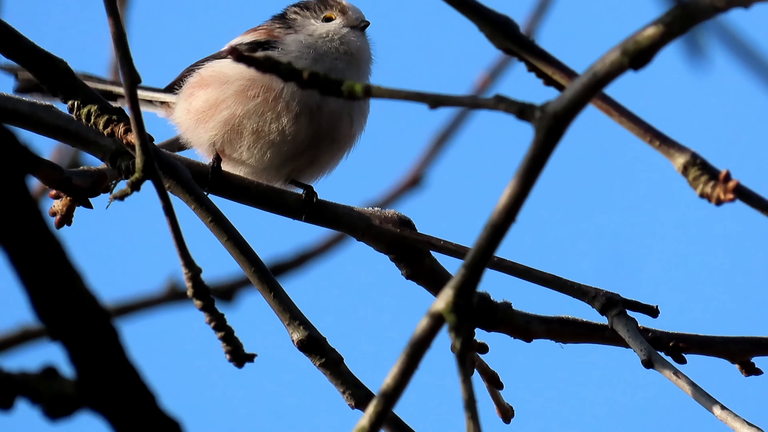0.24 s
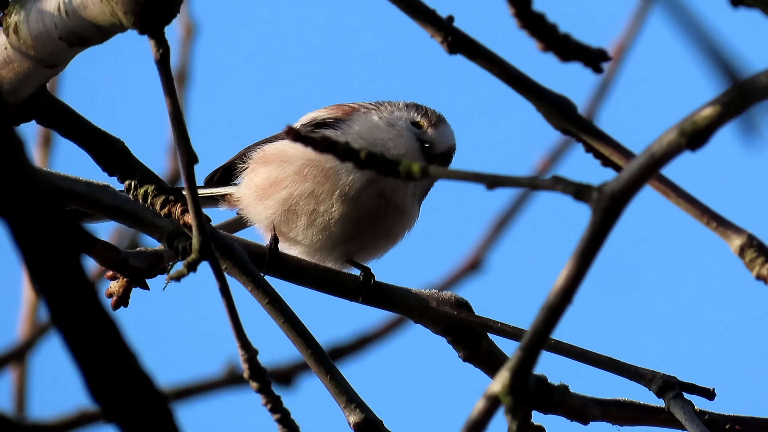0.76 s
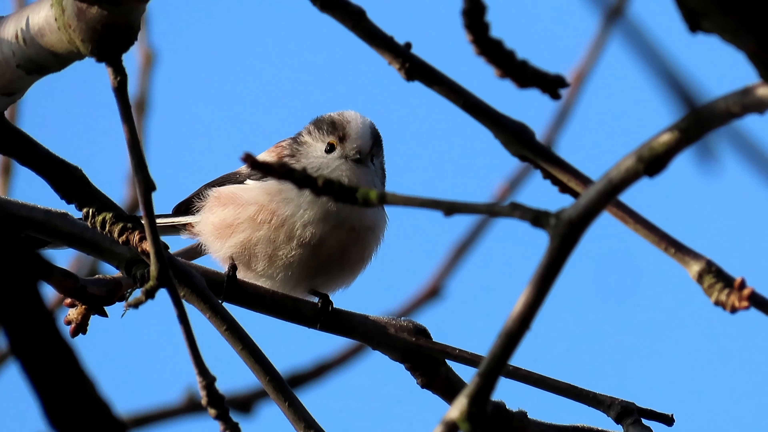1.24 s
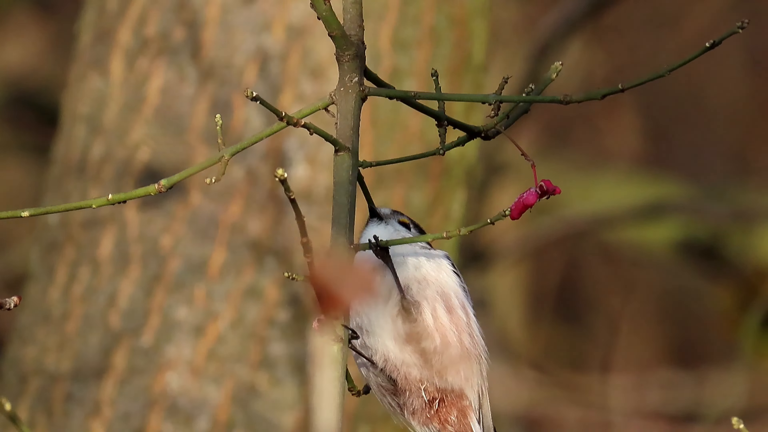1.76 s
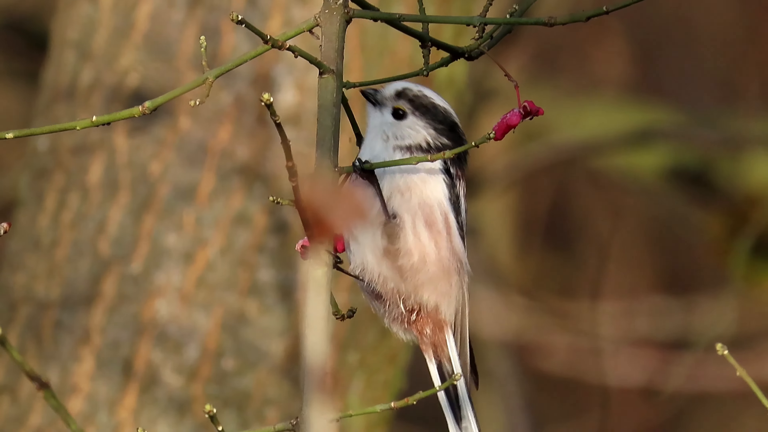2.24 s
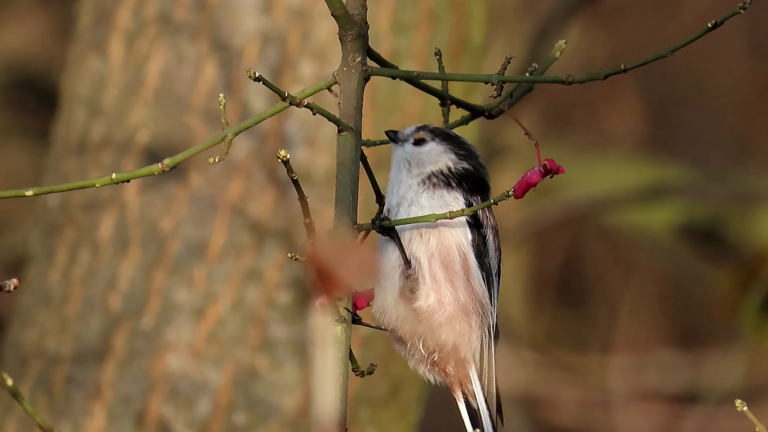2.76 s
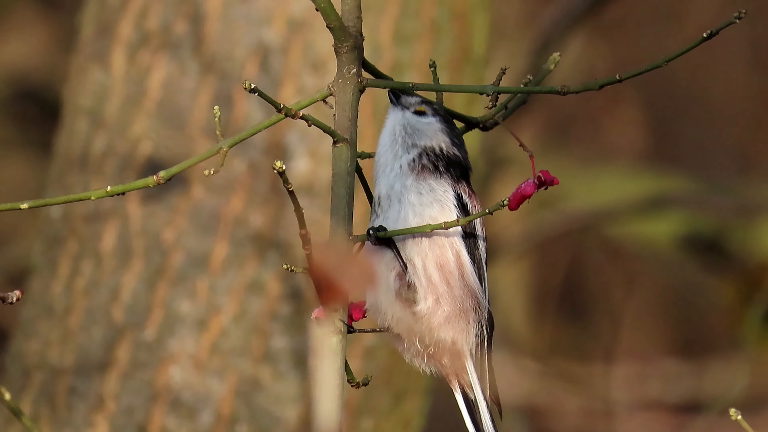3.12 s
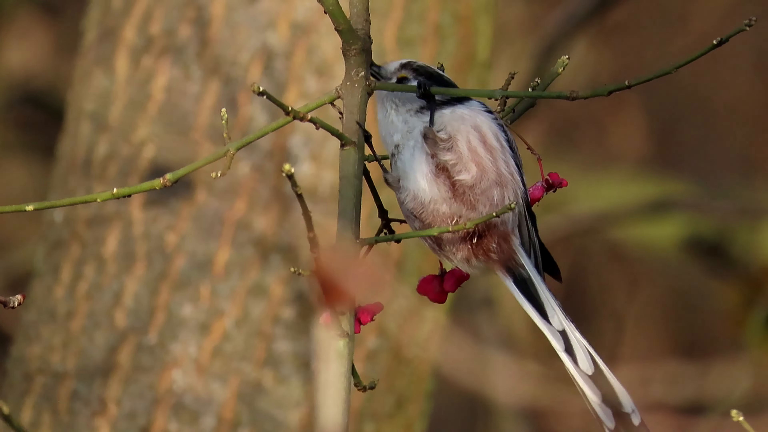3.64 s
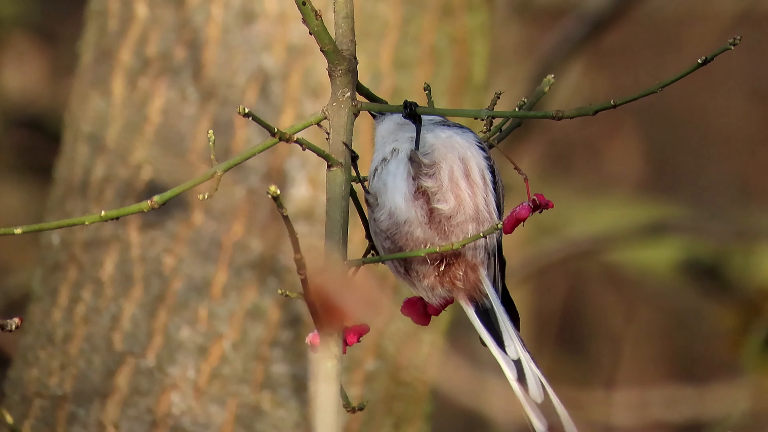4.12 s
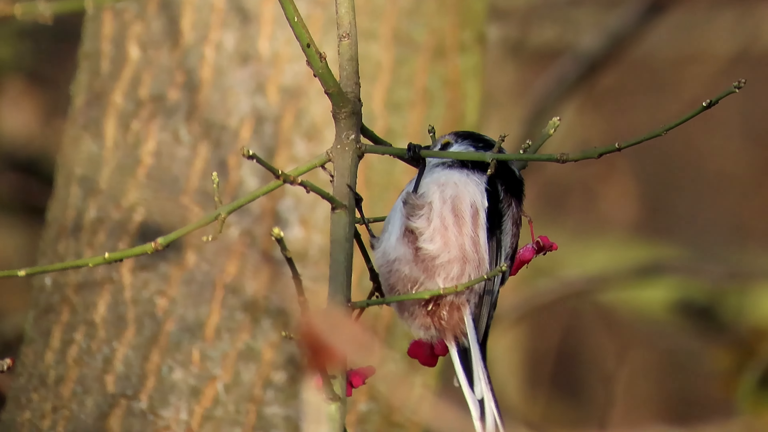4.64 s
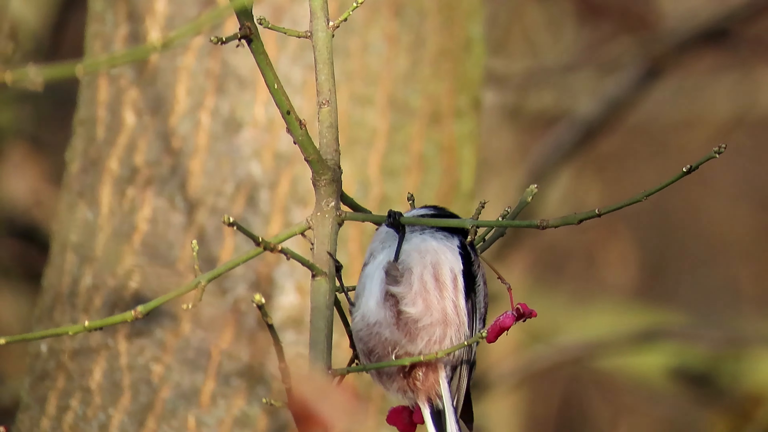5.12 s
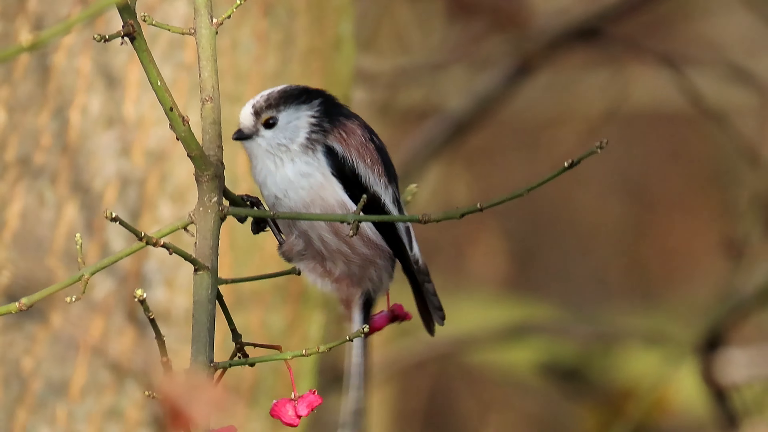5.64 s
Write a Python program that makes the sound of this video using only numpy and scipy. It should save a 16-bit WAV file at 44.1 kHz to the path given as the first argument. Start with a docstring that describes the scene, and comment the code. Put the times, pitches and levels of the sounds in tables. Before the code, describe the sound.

Outdoors among bare branches, a microphone fairly near a small tit picks up five bright, scratchy calls, two pairs and then a later one. Each starts as a very high rippling whistle and breaks into five to seven quick chirring strokes. A distant descending mew opens the scene, faint soft low pips follow, and after the fourth call far thin notes and a throbbing trill fill the gap.

```python
"""Microphone hiss and the falling mew of a larger bird far off; then, from a twig, a small tit calls five times.
Each call is a thin whistle that dives three times, then breaks into a rattle of quick pitch arches, all sung by
a gliding tone with overtones and puffs of air; a twig-and-trunk echo smears it. Soft low hoots are short sine
pips. Late on, far small birds seep and trill: tones that waver on their many paths through the trees."""
import sys
import numpy as np
from scipy import signal
from scipy.fft import rfft, irfft
from scipy.io import wavfile
from scipy.ndimage import uniform_filter1d

SR = 44100
rng = np.random.default_rng(int(sys.argv[2]) if len(sys.argv) > 2 else 0)


def store_pcm(level_fs):
    """Save levels as 16-bit WAV."""
    pcm = np.round(np.clip(level_fs, -1, 1) * 32767).astype(np.int16)
    wavfile.write(sys.argv[1], SR, np.atleast_2d(pcm).T)


def field_ratio(decibels):
    """Amplitude ratio for a level in dB (20 dB per decade); scalars and array-likes work."""
    return 10 ** (np.asarray(decibels, dtype=float) / 20)


N = 259308  # samples in the scene


def evened(x):
    """Scales to rms 1."""
    return x / np.sqrt(np.mean(abs(x) ** 2) + 1e-20)


def read(points, hz, axis=1):
    """Reads a spectrum column on a log-frequency axis."""
    columns = np.transpose(points)
    return np.interp(np.log(hz + 1), np.log(columns[0] + 1), columns[axis])


def add(mix, s, sound):
    """Mixes a sound in at s seconds."""
    part = mix[round(s * SR):][:len(sound)]
    part += sound[:len(part)]


def hiss():
    """Microphone hiss and far air: random short-time spectra, a little patchy."""
    # colour of the hiss, floored at -36 dB: (frequency [Hz], relative density [dB])
    hiss_colour = [(120, -69), (200, -23.5), (278, -28), (359, -14), (386, -13), (430, -14), (926, -13),
                   (1490, -18.5), (2220, -15), (2820, -17.5), (3990, -9), (5850, -9), (8580, 0),
                   (9750, -3.5), (12000, -12), (15800, -18)]
    level_db, patch_db = -62.5, 1.6  # rms of the whole hiss; rms of its patchiness
    frames, hz = N // 512 + 5, np.fft.rfftfreq(2048, 1 / SR)
    real, imaginary, patches = rng.standard_normal((frames, 1025, 3)).T
    patches = uniform_filter1d(patches, 16, 0)  # over frequency
    patches = evened(uniform_filter1d(patches, 8, 1))  # over time
    colour_db = np.maximum(read(hiss_colour, hz), -36)[:, None]
    spectra = (real + 1j * imaginary) * field_ratio(colour_db + patch_db * patches)
    noise = signal.istft(spectra, nperseg=2048, noverlap=1536)[1][:N]
    return field_ratio(level_db) * evened(noise)


def blurred(t, hz, db, blur_hz, clear):
    """A far tone: many paths through the trees make it waver in level and phase; clear = steady share of power."""
    chance = rng.standard_normal((len(t) + 2000, 2)) @ [1, 1j]
    r = np.exp(-np.pi * blur_hz / SR)
    waver = evened(signal.lfilter([1], np.convolve([1, -r], [1, -r]), chance)[2000:])
    paths = np.sqrt(clear) + np.sqrt(1 - clear) * waver
    tone = paths * np.exp(2j * np.pi * np.cumsum(hz) / SR)
    fade = np.clip(np.minimum(t - t[0], t[-1] - t) / 0.0038, 0, 1)
    return np.sqrt(2) * field_ratio(db) * tone.real * fade  # so that db is an rms level


def mew():
    """A larger bird far off: one long falling pitch with its second and third multiples."""
    # glide of the mew: (time [s], pitch [Hz])
    mew_pitch = [(0, 2280), (.1, 2199), (.68, 2147), (.85, 2020), (1.35, 1976)]
    # three swells, two fainter ones, then a fade: (time [s], level [dB], level of the octave [dB])
    mew_level = [(0, -67, -74), (.04, -67.5, -71.5), (.12, -54, -63.5), (0.211, -68.5, -78),
                 (.33, -56, -64), (0.439, -68.5, -77), (0.531, -59, -59.5), (.66, -63.5, -72.5),
                 (.72, -71, -82), (.82, -66, -93), (1.05, -75.5, -99), (1.15, -66.5, -99),
                 (1.22, -77.5, -99), (1.35, -86, -99)]
    out = np.zeros(N)
    t = np.arange(mew_pitch[0][0], mew_pitch[-1][0], 1 / SR)
    hz = np.interp(t, *np.transpose(mew_pitch))
    s, db, octave_db = np.transpose(mew_level)
    db, octave_db = np.interp(t, s, db), np.interp(t, s, octave_db)
    add(out, t[0], blurred(t, hz, db, blur_hz=100, clear=0.55))
    add(out, t[0], blurred(t, 2 * hz, octave_db, blur_hz=112, clear=0.49))
    add(out, t[0], blurred(t, 3 * hz, octave_db - 9, blur_hz=120, clear=0.4))
    return out


def syrinx(turns, levels, puffs, fade_s):
    """A whistle swinging smoothly between turning points (s, Hz) at levels (s, dB), coloured by the throat."""
    # windpipe and beak: (frequency [Hz], gain [dB])
    throat = [(1200, -42.5), (2000, -21.5), (2800, -17.5), (4250, 1.5), (5200, -6), (6200, 3.5),
              (7200, 3.5), (8000, 3.5), (9000, -1.5), (10200, -5.5), (11300, -43), (13000, -70)]
    # slack folds are richer in overtones: (pitch [Hz], change per multiple [dB])
    overtones = [(1300, -3), (2200, -21), (4000, -12.5), (5300, -16.5)]
    pointed = 0.31  # 0 = rounded turns, 1 = straight glides
    # unsteady folds: rms share of the pitch, rms share of the level, fastest flutter [Hz]
    wobble_share, rasp_share, flutter_hz = 0.014, 0.2, 704

    s, hz = np.transpose(turns)
    t = np.arange(s[0], s[-1], 1 / SR)
    step = np.interp(t, s, np.arange(len(s)))
    eased = np.floor(step) + (1 - np.cos(np.pi * (step % 1))) / 2
    glide = np.interp(eased + pointed * (step - eased), np.arange(len(s)), hz)

    flutter = signal.butter(6, flutter_hz, fs=SR, output="sos")
    unsteady = signal.sosfilt(flutter, rng.standard_normal((len(t) + 400, 2)).T)
    wobble, rasp = evened(unsteady[:, 400:])
    pitch = glide * (1 + wobble_share * wobble)
    phase = 2 * np.pi * (np.cumsum(pitch) / SR + rng.random())

    tone = np.zeros(len(t))
    for k in range(1, 6):
        gain_db = (k - 1) * read(overtones, pitch) + read(throat, k * pitch)
        tone += field_ratio(gain_db) * np.sin(k * phase)
    edges = np.clip(np.minimum(t - s[0], s[-1] - t) / fade_s, 0, 1) ** 2
    level = field_ratio(np.interp(t, *np.transpose(levels)))
    sound = tone * level * edges * (1 + rasp_share * rasp)

    # air bursts past the folds at (s, dB, lowest Hz) and dies in a few ms
    for at, db, low_hz in puffs:
        band = signal.butter(4, [low_hz, 6000], "band", fs=SR, output="sos")
        air = signal.sosfilt(band, rng.standard_normal(len(t)))
        age = np.maximum(t - at, 0) / 0.002
        sound += field_ratio(db) * age * np.exp(1 - age) * air
    return s[0], sound


def warble(start_s, start_hz, dives):
    """The held note climbs, dives, overshoots and settles; after the last dive it falls away."""
    # first, second and third dive of any call: (rebound pitch [Hz], loss at the bottom [dB])
    dive_shapes = [(9870, 7.5), (9630, 1.5), (9150, 2)]
    turns, levels = [(start_s, start_hz)], [(start_s, dives[0][3] - 10)]
    for k, (dive, shape) in enumerate(zip(dives, dive_shapes)):
        s, db, low_hz, held_db = dive
        high_hz, lost_db = shape
        top, down, up, rebound = s + np.array([-6.8, -2.8, 3, 5.7]) / 1000
        if k:  # settle after the rebound before
            settled = turns[-1][0] + 0.0058
            turns.append((settled, 7900))
            levels.append((settled, held_db))
        turns += [(top, 8850 - 230 * k), (s, low_hz), (rebound, high_hz)]
        levels += [(top, held_db - 4 * (k > 0)), (down, db), (s, db - lost_db)]
        levels += [(up, db + 3.5), (rebound, held_db - 4.5)]
    turns.append((s + 0.0165, 1700))
    levels.append((rebound + 0.0024, db - 2.5))
    puffs = [(row[0] - 0.001, row[1] - 15, 2600) for row in dives]  # the voice catches at each bottom
    return syrinx(turns, levels, puffs, fade_s=0.0022)


def arch(s, db, crest_hz, lead_db):
    """A lead-in slides down, then the pitch shoots over the crest and back; higher crests take longer."""
    # tauter folds start higher: (crest pitch [Hz], pitch at the start of the lead-in [Hz])
    lead_ins = [(6150, 1600), (6550, 1700), (7550, 4800)]
    half = 0.003 + (crest_hz - 4000) / 820000  # s from foot to crest, nearly
    lead_hz = read(lead_ins, crest_hz)
    foot_hz = 1300 + 0.1 * (lead_hz - 1300)
    start = s - half - 0.004 - (lead_hz - 1300) / 1100e3
    turns = [(start, lead_hz), (s - half - 0.0008, foot_hz), (s, crest_hz), (s + half + 0.0018, 1400)]
    crest_db = db - 2 - (crest_hz - 4500) / 400  # the voice thins as it climbs
    levels = [(s - half - 0.0015, lead_db), (s - half + 0.0022, db), (s, crest_db), (s + half - 0.003, db + 1.5)]
    return syrinx(turns, levels, [(start, db - 21.5, 1100)], fade_s=0.0012)


def slip(s, db, from_hz, to_hz, length):
    """A lone falling stroke: the folds glide down once, with a puff of air."""
    return syrinx([(s, from_hz), (s + length, to_hz)], [(s, db)], [(s, -56, 2500)], fade_s=0.001)


def wood(x, echo_ms, echo_db, scatter_db, dull_hz):
    """A few near echoes, then sparse scattering from branches, both coloured alike; one band is dulled."""
    # echo colour and decay: (frequency [Hz], gain [dB], time to fall 60 dB [s])
    scatter = [(2100, -13, 0.091), (3300, -14.5, 0.085), (4100, -4, 0.064), (5000, 0.5, 0.14),
               (5900, -3, 0.11), (8200, -3.5, 0.11), (9500, -1.5, 0.022)]
    # further near echoes: (delay [ms], level before colouring [dB])
    twigs = [(2.45, -2), (4.6, -7.5), (5.8, -15), (7.2, -6.5)]
    near, far = np.zeros(SR // 2), np.zeros(SR // 2)
    for ms, db in [(echo_ms, echo_db)] + twigs:
        near[round(ms * SR / 1000)] += field_ratio(db)

    # one echo of random sign in every 20 samples
    at = np.arange(150, len(far) - 20, 20)
    far[at + rng.integers(0, 20, len(at))] = rng.choice([-1.0, 1.0], len(at))
    hz, t, spectra = signal.stft(far, SR, nperseg=128)
    t60 = read(scatter, hz, axis=2)[:, None]
    decay = field_ratio(-60 * t / t60) + field_ratio(-13 - 60 * t / (2.94 * t60))  # near branches, then the farther trees
    far = signal.istft(spectra * decay, SR, nperseg=128)[1][:len(near)]

    taps = near + field_ratio(scatter_db) * far / np.linalg.norm(far)
    colour = field_ratio(read(scatter, np.fft.rfftfreq(len(taps) + 256, 1 / SR)))
    taps = np.roll(irfft(rfft(np.pad(taps, 128)) * colour), -128)[:len(near)]
    heard = np.pad(x, (0, len(taps) - 1)) + signal.fftconvolve(x, taps)
    hz = np.fft.rfftfreq(len(heard), 1 / SR)
    dull_db = -6.5 * np.exp(-((hz - dull_hz) / 380) ** 2)
    return irfft(rfft(heard) * field_ratio(dull_db), len(heard))


def tit():
    """Five calls, each heard from its own perch; so small a body radiates no bass."""
    # one row a call: (start [s], first pitch [Hz], near echo delay [ms], near echo before colouring [dB],
    # scatter before colouring [dB], dull band [Hz])
    starts = [(.731, 7160, 3.4, -8.5, -4.5, 6730), (1.508, 8160, 2.93, 0, -2.5, 6730),
              (2.679, 7320, 2.8, -9, -4, 6900), (3.386, 8200, 3.1, 4.5, 2, 7450),
              (5.216, 7290, 1.42, 1, -2, 5250)]
    # three dives a call, levels before the throat:
    # (time of the bottom [s], level on the way down [dB], bottom pitch [Hz], level of the held note before [dB])
    call_dives = [
        [(.7455, -30, 4483, -28), (.7720, -27.5, 5000, -32.5), (.7980, -29, 4100, -34.5)],
        [(1.5195, -29, 4534, -34), (1.5465, -30.5, 5200, -34.5), (1.5742, -30, 4100, -37)],
        [(2.6942, -28.5, 4400, -33.5), (2.7207, -30.5, 4410, -34), (2.7477, -28, 3705, -30)],
        [(3.3990, -33.5, 4255, -40), (3.4265, -32.5, 5270, -43.5), (3.4550, -31, 3300, -47)],
        [(5.2315, -34, 5820, -31), (5.2595, -33.5, 5760, -34.5), (5.2880, -32.5, 3840, -33)],
    ]
    # the rattle of each call, levels before the throat:
    # (time of the crest [s], level [dB], crest pitch [Hz], level of the lead-in [dB])
    call_arches = [
        [(.8331, -30, 7260, -41), (.8645, -35, 6350, -39), (.9393, -31.5, 6080, -30), (.9722, -33.5, 6220, -37),
         (1.0141, -31.5, 5860, -32), (1.0513, -35.5, 5600, -28.5), (1.0980, -34, 5760, -32)],
        [(1.6115, -30.5, 7590, -33.5), (1.6458, -30.5, 6480, -37), (1.6850, -29.5, 5670, -63),
         (1.7210, -33, 5670, -31), (1.7651, -32, 5470, -28.5)],
        [(2.7852, -29.5, 7680, -35.5), (2.8213, -30, 6600, -37), (2.8597, -30.5, 5880, -66),
         (2.8965, -34, 6050, -28.5), (2.9391, -30.5, 6030, -37), (2.9736, -32, 5100, -30.5)],
        [(3.4956, -31.5, 7130, -68), (3.5320, -33, 6300, -47), (3.5673, -35, 5540, -29),
         (3.6102, -33, 5474, -31), (3.6509, -34, 5660, -40)],
        [(5.3284, -32.5, 7480, -32.5), (5.3660, -30.5, 6060, -44), (5.4025, -33.5, 6120, -31),
         (5.4431, -32, 5330, -44), (5.4842, -32, 5600, -42), (5.5228, -32, 5260, -59)],
    ]
    # falling stroke in the first rattle: (time [s], level before the throat [dB], from [Hz], to [Hz], length [s])
    slip_row = (.8945, -37, 4450, 1500, .0075)
    out = np.zeros(N)
    for (start_s, start_hz, *echo), dives, arches in zip(starts, call_dives, call_arches):
        call = np.zeros(SR // 2)
        strokes = [warble(start_s, start_hz, dives)] + [arch(*row) for row in arches]
        if 0 < slip_row[0] - start_s < 0.3:  # the first call alone
            strokes.append(slip(*slip_row))
        for s, sound in strokes:
            add(call, s - start_s, sound)
        add(out, start_s, wood(call, *echo))
    return signal.sosfilt(signal.butter(4, 800, "high", fs=SR, output="sos"), out)


def hoots():
    """Short soft low pips: 15 ms of a sine under a bell-shaped swell."""
    # two groups of pips: (time, 2 ms after the pip starts [s], peak level [dB], pitch [Hz])
    pips = [(1.191, -67, 410), (1.215, -61.5, 409), (1.245, -62, 413), (1.268, -62, 398), (1.325, -63, 400),
            (2.9, -70.5, 410), (2.93, -74, 384), (2.961, -79, 362), (3.007, -78, 401)]
    out, t = np.zeros(N), np.arange(0, 0.015, 1 / SR)
    for s, db, hz in pips:
        tone = np.sin(2 * np.pi * (hz * t + rng.random()))
        add(out, s - 0.002, field_ratio(db) * tone * np.hanning(len(t)))
    return out


def seeps():
    """Far small birds: thin notes whose pitch sinks or holds as they fade."""
    # one row a note: (start [s], length [s], from [Hz], to [Hz], level at the start [dB])
    seep_notes = [(4.36, 0.15, 6980, 6920, -69), (4.514, 0.16, 7150, 6800, -67),
                  (4.652, 0.086, 5370, 5370, -66), (4.739, .065, 5400, 5300, -65.5)]
    fall_s, fade_db = 0.035, 8  # time constant of the pitch; fade over the note
    out = np.zeros(N)
    for s, length, from_hz, to_hz, db in seep_notes:
        t = np.arange(0, length, 1 / SR)
        hz = to_hz + (from_hz - to_hz) * np.exp(-t / fall_s)
        add(out, s, blurred(t, hz, db - fade_db * t / length, blur_hz=150, clear=0.55))
    return out


def trill():
    """A far small bird holds one steady pitch while its level grows and throbs."""
    # the trill: (start [s], end [s], pitch [Hz], first level [dB], last level [dB]), before the throb
    trill_row = (4.80, 5.5, 5198, -68, -60.5)
    throb_per_s, throb_top_s, throb_db = 9.1, 4.98, 4.5  # rate, time of one crest, swing either way
    out = np.zeros(N)
    start, end, hz, first_db, last_db = trill_row
    t = np.arange(start, end, 1 / SR)
    grown = (t - start) / (end - start)
    throb = throb_db * np.cos(2 * np.pi * throb_per_s * (t - throb_top_s))
    db = first_db + (last_db - first_db) * grown + throb
    add(out, start, blurred(t, np.full(len(t), hz), db, blur_hz=150, clear=0.55))
    return out


def scene():
    """All sources, one channel."""
    return (hiss() + mew() + tit() + hoots() + seeps() + trill())[None]


def band_limit(x):
    """A steep low-pass at the top of the band."""
    return signal.sosfilt(signal.butter(12, 15820, fs=SR, output="sos"), x)


def record(dry):
    """Takes down the finished mix."""
    return band_limit(dry)


dry = scene()
out = record(dry)
store_pcm(out)
```